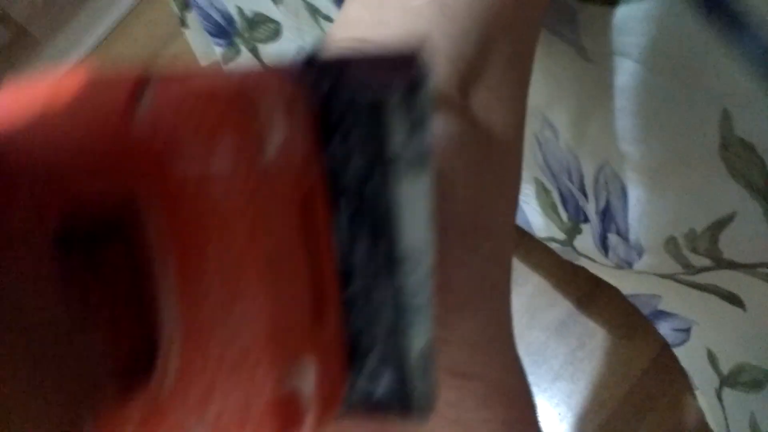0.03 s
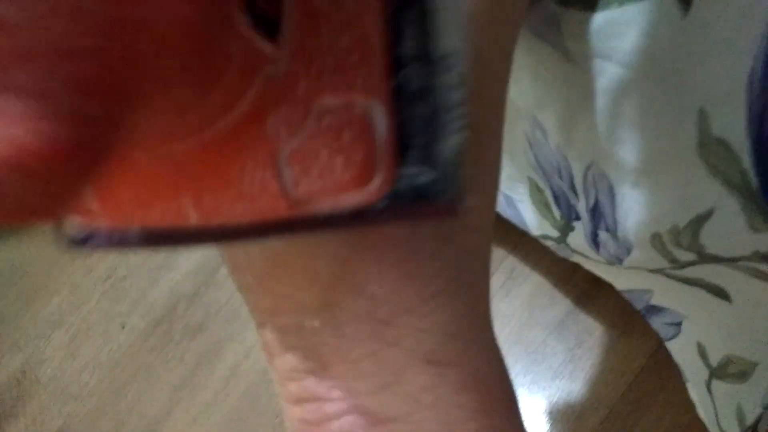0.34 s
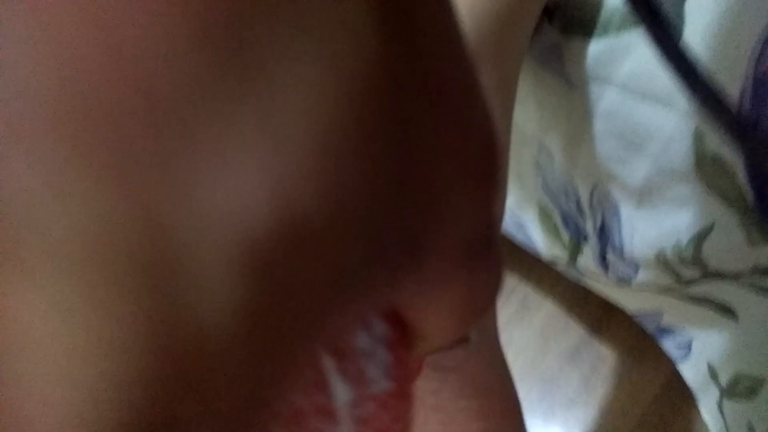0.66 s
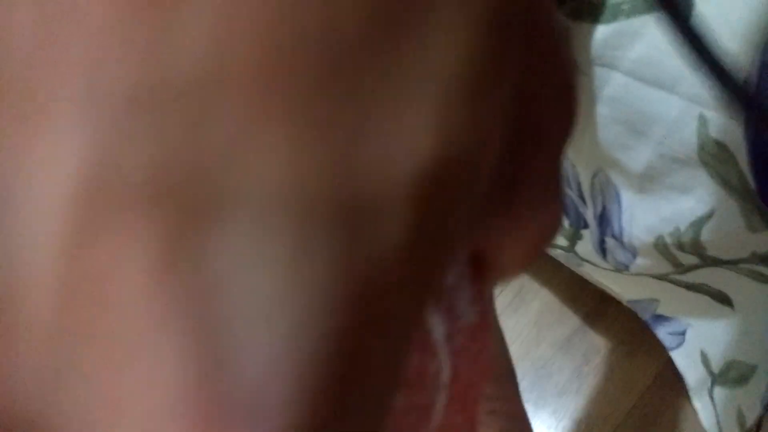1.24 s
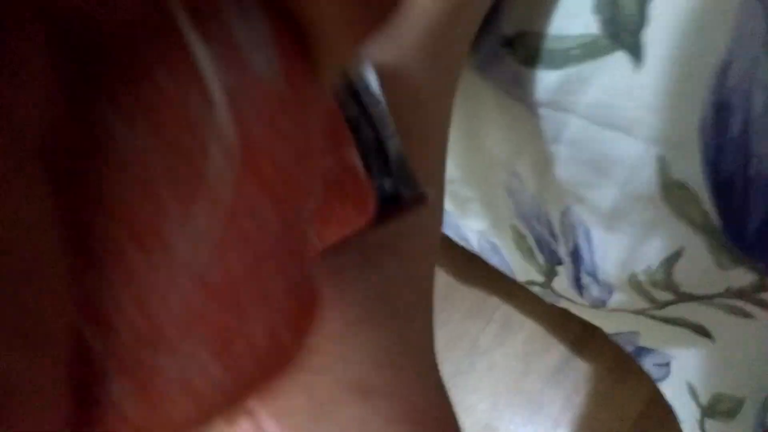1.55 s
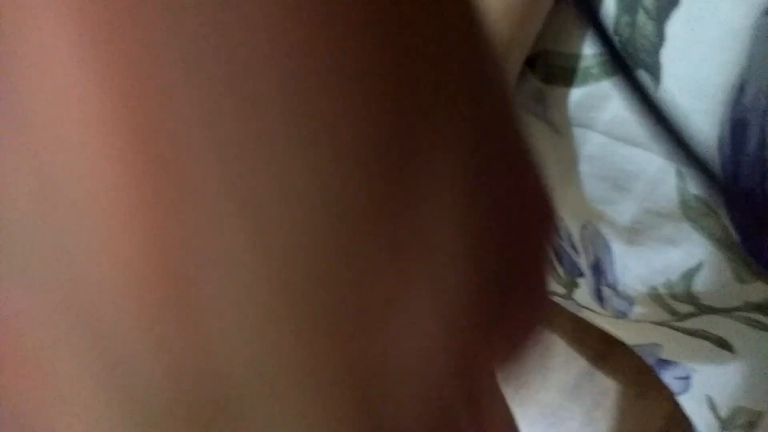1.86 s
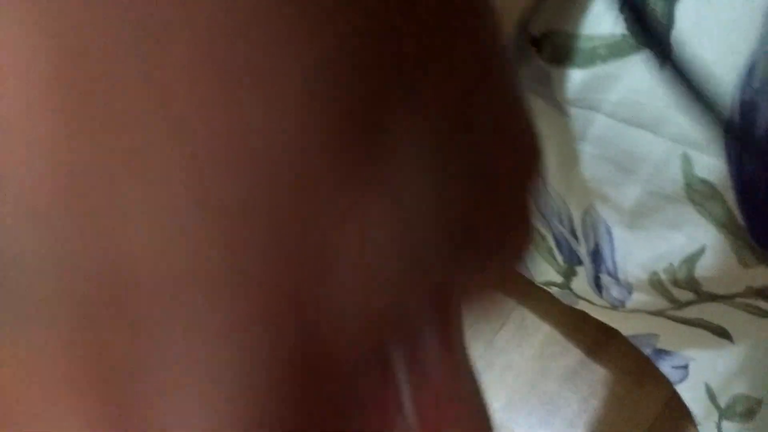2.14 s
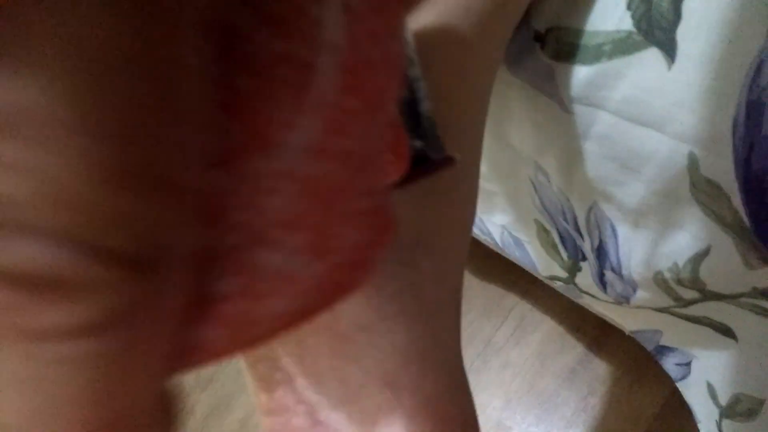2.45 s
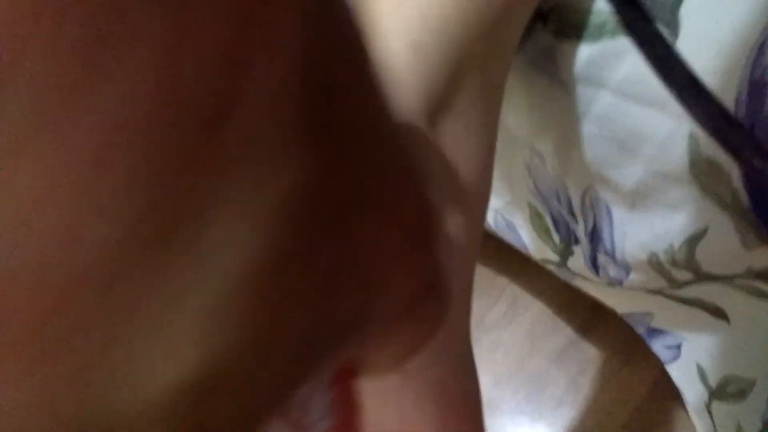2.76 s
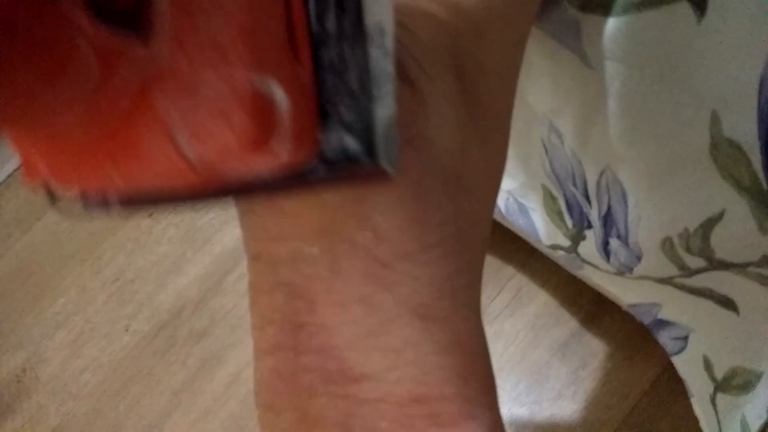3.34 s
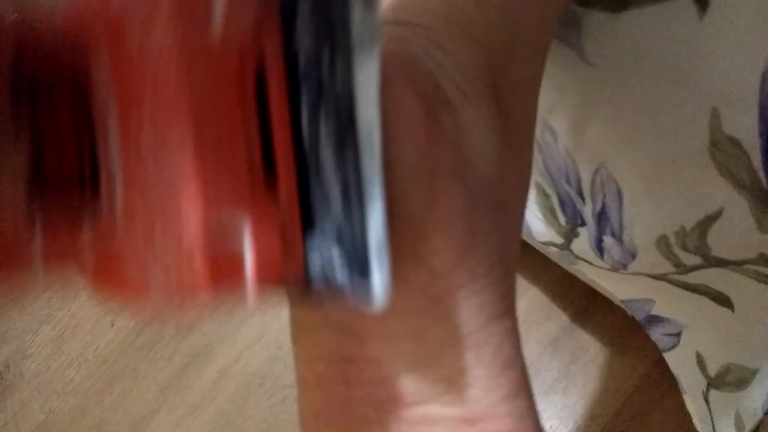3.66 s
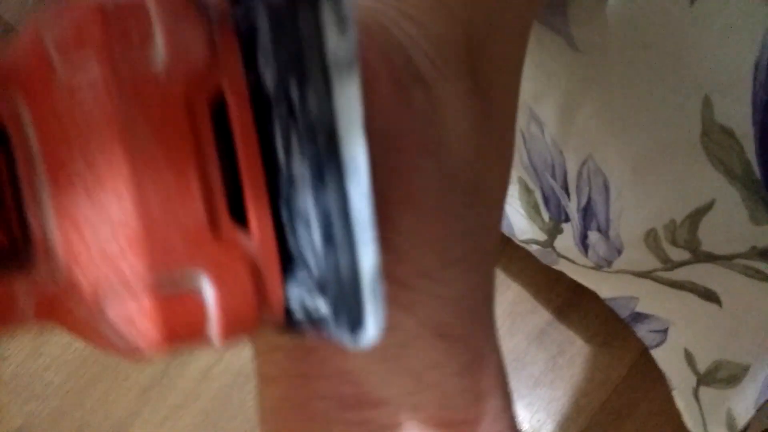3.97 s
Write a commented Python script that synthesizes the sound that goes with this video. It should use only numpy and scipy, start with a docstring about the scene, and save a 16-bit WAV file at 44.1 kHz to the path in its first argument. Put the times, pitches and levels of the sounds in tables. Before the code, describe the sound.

Close, continuous motor buzz of an electric hand sander, with rattle, hiss and light scraping.

```python
"""A small room, with a handheld electric sander close to a stereo microphone, moved with a light touch.
The cooling fan hisses throughout. The motor turns about 121 times a second and the pad knocks twice
a turn, so the housing hums, rings and rattles. The paper rasps in time with the strokes and swells
where it bites. The fan and the brighter sounds carry into the room; the low tones stay close and dry."""
import sys
import numpy as np
from scipy import signal
from scipy.fft import rfft, irfft
from scipy.io import wavfile

SR = 44100
rng = np.random.default_rng(int(sys.argv[2]) if len(sys.argv) > 2 else 0)


def int16_out(signal):
    """Quantize to a 16-bit WAV file."""
    q = np.round(np.clip(np.atleast_2d(signal).T, -1, 1) * 32767)
    wavfile.write(sys.argv[1], SR, q.astype(np.int16))


N = 176400
TIME = np.arange(N) / SR
HZ = np.maximum(np.fft.rfftfreq(N, 1 / SR), 1)
SIDES = np.array([[0.5], [-0.5]])   # splits a difference between left and right
# An order is a multiple of the motor speed; a lag is a delay behind the main knock.
RATTLE_FROM_ORDER, BUZZ_FROM_ORDER, SIZZLE_FROM_ORDER, END_ORDER = 14, 25, 35, 76
RING_LAG_TURNS, RATTLE_LAG_TURNS, STROKE_LAG_TURNS = 0.02, 0.39, 0.584


def from_db(db):
    """Decibels to gain."""
    return 10 ** (np.asarray(db) / 20)


def rms_one(x):
    """Scale to rms 1."""
    return x / np.sqrt(np.mean(np.abs(x) ** 2))


def in_time(rows):
    """A (time, value) table at every sample."""
    return np.interp(TIME, *np.transpose(rows))


def fader(rows):
    """A (time, dB) table as a gain at every sample."""
    return from_db(in_time(rows))


def at_hz(spectrum, hz):
    """Read a spectrum on a log-frequency axis."""
    frequencies, db = np.transpose(spectrum)
    return np.interp(np.log(hz), np.log(frequencies), db)


def drift(rate_hz, block=200):
    """Slow complex wander of spread about 1, drawn once a block and joined by ramps."""
    pole = np.exp(-2 * np.pi * block * rate_hz / SR)
    settle = 2 * block
    draws = [1, 1j] @ rng.standard_normal((2, N // block + settle + 2))
    slow = rms_one(signal.lfilter([1], [1, -2 * pole, pole * pole], draws)[settle:])
    ramps = slow[:-1, None] + np.diff(slow)[:, None] * (np.arange(block) / block)
    return ramps.ravel()[:N]


def partial(turns, order, waver, smear_turns=0.008):
    """One multiple of the motor speed, wavering in level and phase; rms 1."""
    delay = smear_turns * min(order, BUZZ_FROM_ORDER)   # the housing smears each knock
    angle = 2 * np.pi * (order * (turns - delay) % 1)
    gain = 1 + waver * drift(rate_hz=1.5 * (1 + order / 36))   # high partials waver faster
    return rms_one(gain.real * np.cos(angle) - gain.imag * np.sin(angle))


def noise(spectrum, gate):
    """Gated white noise, coloured to a spectrum in dB per Hz."""
    white = rng.standard_normal(N) * gate
    return irfft(rfft(white) * from_db(at_hz(spectrum, HZ)), N) * np.sqrt(SR / 2)


def strokes(turns, steady, sharpness=15.8):
    """Two equal bursts a turn, out and back, over a steady part; rms 1."""
    swing = np.cos(2 * np.pi * (turns - STROKE_LAG_TURNS))
    return rms_one(steady + np.exp(sharpness * (swing - 1)) + np.exp(-sharpness * (swing + 1)))


def room(x, t60_s=0.95):
    """The walls return a diffuse tail, unrelated left and right, already sounding at the start."""
    tail = rng.standard_normal((2, N)) * from_db(-60 * TIME / t60_s)
    tail /= np.sqrt(np.sum(tail ** 2, axis=1, keepdims=True))
    return irfft(rfft(x) * rfft(tail), N)


# Left against right at the microphone: (frequency [Hz], phase lead [rad], level difference [dB])
STEREO_IMAGE = [(239, -1, 1), (520, -1.76, 3.5), (750, 0.53, 2.5), (935, 0.72, 5), (1176, 0.01, 0),
                (1454, 0.89, -2), (1866, 2.5, 1), (2410, 3, -.5), (2754, 3.5, -4), (3170, 0.66, 0),
                (4060, 0.7, -1), (4770, 2.5, 1), (6400, 6.5, 2), (7730, 9.5, 0.5), (14470, 25, -0.5)]


def microphone(x):
    """Direct sound reaches the two channels with a phase and level difference that depends on pitch."""
    hz, lead, lean_db = np.transpose([(0, 0, 0)] + STEREO_IMAGE)
    bins_hz = np.fft.rfftfreq(2 * N, 1 / SR)
    phase = np.exp(1j * SIDES * np.interp(bins_hz, hz, lead))
    gain = from_db(SIDES * np.interp(bins_hz, hz, lean_db))
    mirrored = np.hstack([x, np.fliplr(x)])   # keeps the ends free of clicks
    return irfft(rfft(mirrored) * phase * gain)[:, :N]


# Fan air behind the tool's tones, at 0 dB of swell: (frequency [Hz], density [dB per Hz])
FAN_SPECTRUM = [(30, -111), (80, -93.5), (170, -75), (400, -69.5), (1500, -100), (3200, -67.5), (5000, -64),
                (6200, -63.5), (7000, -64), (7900, -70), (9700, -76.5), (12000, -80), (14600, -83),
                (15600, -117)]
# Swell of that air, shared by the sizzle: (time [s], gain [dB])
AIR_SWELL = [(0, -2), (.5, -4.5), (1.1, -0.5), (1.4, -4), (1.7, -3), (2.55, -0.5), (3.0, 1.4), (3.45, 0),
             (4, 2)]


def fan(turns):
    """The cooling fan blows a hiss that pulses slightly with the strokes."""
    return noise(FAN_SPECTRUM, fader(AIR_SWELL) * strokes(turns, steady=5.4))


# The tool's treble from close by: (frequency [Hz], base level of an even partial [dB])
OVERTONE_SPECTRUM = [(3100, -31.5), (3400, -34), (3700, -33), (4200, -36.5), (5200, -42.5), (6400, -39.5),
                     (7300, -45), (9200, -56), (11000, -65)]


def overtones(turns, orders, waver, odd_drop_db=6):
    """The sharp edges of the knocks make restless partials; two knocks a turn weaken the odd ones."""
    mean_speed = (turns[-1] - turns[0]) / TIME[-1]
    return sum(from_db(at_hz(OVERTONE_SPECTRUM, order * mean_speed) - odd_drop_db * (order % 2))
               * partial(turns, order, waver) for order in orders)


def sizzle(turns):
    """The highest overtones thin to a fine sizzle that rises and falls with the fan's hiss."""
    return fader(AIR_SWELL) * overtones(turns, range(SIZZLE_FROM_ORDER, END_ORDER), waver=1.3)


# Swell of the buzz at 3 to 4 kHz: (time [s], gain [dB])
BUZZ_SWELL = [(0, 2), (.57, -.5), (1.0, 3.5), (1.35, 1.5), (1.6, 2.5), (1.8, -1), (2.2, 3), (2.55, -6),
              (2.75, 2), (3.1, -5.5), (3.4, -1.5), (4, -4)]


def buzz(turns):
    """The overtones just above the rattle buzz in step with it."""
    orders = range(BUZZ_FROM_ORDER, SIZZLE_FROM_ORDER)
    return fader(BUZZ_SWELL) * overtones(turns - RATTLE_LAG_TURNS, orders, waver=0.85)


# Hum of the body, close up: (time [s], level [dB])
HUM_LEVEL = [(0.0, -32), (0.47, -31.5), (0.59, -30), (1.39, -30), (1.65, -31), (3.22, -26.5), (4.0, -27)]
# Where it sits in front of the microphone: (time [s], left over right [dB])
HUM_PAN = [(0, 4), (.25, -12), (.67, 15.5), (1.1, -21.5), (1.48, 13), (1.9, -7), (2.55, 2), (2.95, -3),
           (3.65, 3), (4, 0.5)]


def hum(turns):
    """The body shakes twice a turn: a clean low tone that leans from side to side as the tool moves."""
    pan = from_db(SIDES * in_time(HUM_PAN))
    pan /= np.sqrt(np.mean(pan ** 2, axis=0))
    return fader(HUM_LEVEL) * partial(turns, order=2, waver=0) * pan


# Paper on the work at a light touch, close up: (frequency [Hz], density [dB per Hz])
RASP_SPECTRUM = [(30, -111), (90, -117), (180, -88), (300, -102), (520, -68.5), (670, -64), (1020, -66),
                 (1270, -60.5), (1600, -67), (2200, -59), (2700, -62.5), (3400, -64.5), (4500, -67),
                 (7000, -82), (15000, -112)]
# Where it bites: (time [s], half length [s], relative grind [dB], relative scrape [dB])
PAPER_BITES = [(0.42, 0.054, 5.5, 6), (0.836, 0.06, 9.5, 9), (1.598, 0.055, 1, 8), (1.787, 0.037, 2, 5),
               (2.218, 0.029, -7, 5.5), (2.58, 0.11, -20, 2.5), (3.024, 0.026, 2.5, -6),
               (3.547, 0.021, 3, 8), (3.785, 0.04, 0, 6.5)]


def paper(turns, bite_db=0.5, crossover_hz=2570):
    """The paper rasps at each stroke; each bite adds power to a dull grind and a bright scrape."""
    power = np.ones((2, N))   # grind and scrape at a light touch
    for at_s, half_s, grind_db, scrape_db in PAPER_BITES:
        swell = np.exp(-((TIME - at_s) / half_s) ** 2 / 2)
        power += (from_db([[grind_db], [scrape_db]]) * from_db(bite_db) * swell) ** 2
    gate = strokes(turns, steady=1)
    rasp = 0
    for side, grip in zip(("low", "high"), np.sqrt(power)):
        band = signal.butter(3, crossover_hz, side, fs=SR, output="sos")
        rasp += signal.sosfilt(band, noise(RASP_SPECTRUM, gate * grip))
    return rasp


# The shell close up, near 2.7 and 2.9 kHz, each: (time [s], level [dB])
LOWER_WHINE = [(0, -34), (.2, -33.5), (.45, -38), (.65, -30), (1.12, -29), (1.22, -22), (1.55, -27),
               (1.68, -38.5), (2.12, -28), (2.35, -30.5), (3.1, -30), (3.8, -27), (4, -33)]
UPPER_WHINE = [(0, -21), (.1, -22), (.52, -30), (.68, -31), (1.0, -31), (1.45, -31), (2.05, -28),
               (2.4, -28.5), (3.1, -25.5), (3.4, -27.5), (4, -31.5)]


def whine(turns):
    """Two shrill resonances of the shell swell and fade as the tool is tilted."""
    return sum(fader(level) * partial(turns - RATTLE_LAG_TURNS, order, waver=0.55)
               for level, order in ((LOWER_WHINE, 22), (UPPER_WHINE, 24)))


# Partials of the pad's knock and rattle, close up: (order [cycles per turn], base level [dB])
PAD_PARTIALS = [(3, -60.5), (4, -32), (5, -36), (7, -36), (8, -29.5), (9, -39.5), (11, -37), (13, -38),
                (14, -32), (15, -32), (16, -27.5), (17, -30), (18, -24), (19, -39), (20, -30), (21, -44.5),
                (23, -28.5)]
# Swells of the low even partials, the low odd ones and the rattle near 2 kHz: (time [s], gain [dB])
KNOCK_SWELL = [(0, -2), (.1, 5.5), (.28, -5), (.42, 4.5), (.56, -1), (.7, 2), (.9, 4.5), (1.06, -5),
               (1.25, 4.5), (1.48, 2), (1.75, -4), (2.1, 1.5), (2.5, -5.5), (2.6, -6.5), (2.85, -7),
               (3.2, 0), (4, -2.5)]
UNEVEN_SWELL = [(0, 3), (.2, 2), (.42, -2.5), (.7, -2), (.8, 5), (.95, 5.5), (1.22, 6), (1.5, -15),
                (1.66, 1), (1.95, 1), (2.2, -2), (2.5, -8), (2.78, 1.5), (3.05, 2.5), (3.26, -7.5),
                (3.45, -2.5), (4, -1)]
RATTLE_SWELL = [(0, 3), (.13, 7), (.32, -1), (.55, -0.5), (.88, 5), (1.03, 4.5), (1.25, -1), (1.7, -2.5),
                (2.03, -1.5), (2.52, -2.5), (2.62, -8.5), (3.3, -4.5), (3.5, -4), (4, -8)]


def pad(turns):
    """The pad knocks twice a turn, unequal knocks adding odd partials; a rattle follows once a turn."""
    knock, rattle = 0, 0
    late = turns - RATTLE_LAG_TURNS
    for order, db in PAD_PARTIALS:
        if order >= RATTLE_FROM_ORDER:
            rattle += from_db(db) * fader(RATTLE_SWELL) * partial(late, order, waver=0.7)
        elif order % 2:
            knock += from_db(db) * fader(UNEVEN_SWELL) * partial(turns, order, waver=0.55)
        else:
            knock += from_db(db) * fader(KNOCK_SWELL) * partial(turns, order, waver=0.17)
    return knock, rattle


# The housing right at the microphone, near 730, 1210 and 1450 Hz, each: (time [s], level [dB])
DEEP_RING = [(0, -21.5), (.3, -29.5), (.5, -22.5), (.65, -19), (.95, -24), (1.08, -30.5), (1.3, -22),
             (1.5, -21.5), (1.7, -27), (2.45, -26), (2.6, -29), (3.0, -32.5), (3.15, -26.5), (3.7, -30),
             (4, -37)]
MIDDLE_RING = [(0.0, -24), (0.27, -38.5), (0.41, -20.5), (0.65, -14.1), (0.73, -25.5), (0.84, -20.5),
               (0.92, -36), (1.14, -34), (1.31, -15.5), (1.43, -11.0), (1.57, -18), (1.63, -39),
               (1.69, -25), (2.43, -25.5), (2.53, -39), (3.13, -38), (3.21, -22.5), (3.5, -26),
               (4.0, -30.5)]
HIGH_RING = [(0, -34), (.15, -30), (.6, -36.5), (.95, -26), (1.25, -31.5), (1.9, -44), (2.4, -31.5),
             (2.65, -42.5), (2.9, -29), (3.3, -25), (3.55, -26.5), (3.61, -38), (4, -26.5)]


def housing(turns):
    """The knocks keep three resonances of the housing ringing, each on one multiple of the speed."""
    return sum(fader(level) * partial(turns - RING_LAG_TURNS, order, waver=0.12)
               for level, order in ((DEEP_RING, 6), (MIDDLE_RING, 10), (HIGH_RING, 12)))


# The motor that drives it all: (time [s], speed [turns per second])
MOTOR_SPEED = [(0.0, 121.16), (0.16, 120.38), (0.27, 121.0), (0.59, 121.59), (0.73, 121.33), (0.9, 119.99),
               (0.96, 119.99), (1.35, 122.11), (1.63, 121.23), (1.84, 119.81), (2.02, 119.6),
               (2.16, 120.56), (2.53, 121.09), (2.76, 120.05), (2.92, 120.71), (3.1, 120.95),
               (3.33, 122.06), (3.67, 121.68), (3.8, 120.65), (4.0, 121.75)]


def motor():
    """Turns completed so far, at a speed that wanders slightly."""
    return np.cumsum(in_time(MOTOR_SPEED)) / SR


def scene():
    """The sander at the microphone, every layer following the motor, with the room behind it."""
    turns = motor()
    knock, rattle = pad(turns)
    bright = rattle + buzz(turns) + sizzle(turns)
    air = fan(turns)
    bright += whine(turns) + paper(turns)
    direct = hum(turns) + housing(turns) + knock + bright + air
    return microphone(direct) + room(from_db(-6.5) * bright + from_db(-11) * air)


def record(dry, stopband_hz=16300):
    """A steep low-pass cuts the very top of the hiss."""
    return signal.sosfilt(signal.cheby2(12, 70, stopband_hz, fs=SR, output="sos"), dry)


dry = scene()
out = record(dry)
int16_out(out)
```